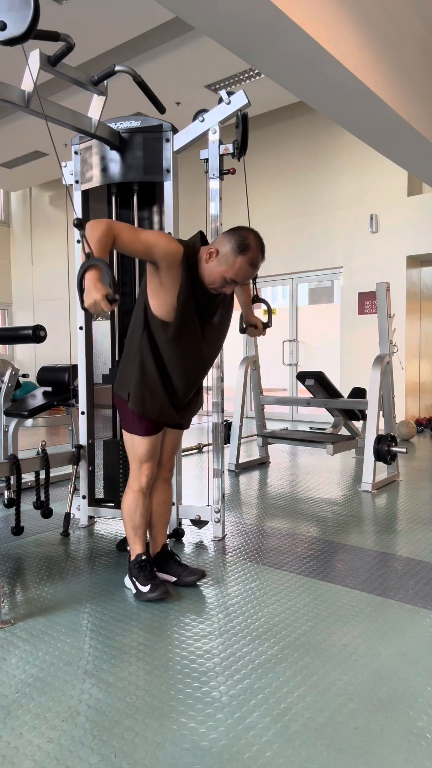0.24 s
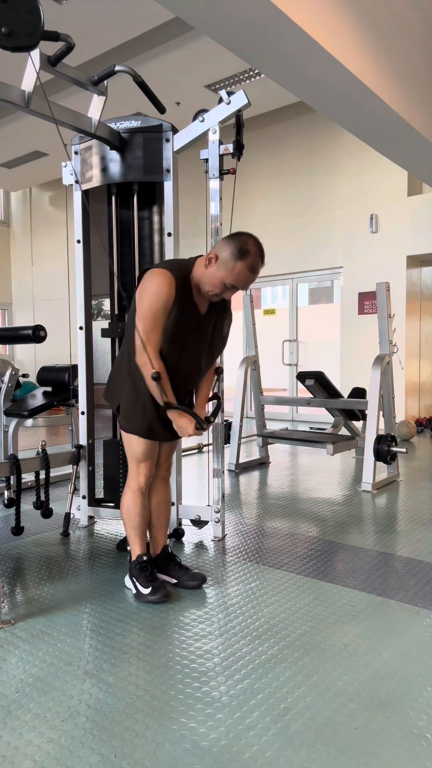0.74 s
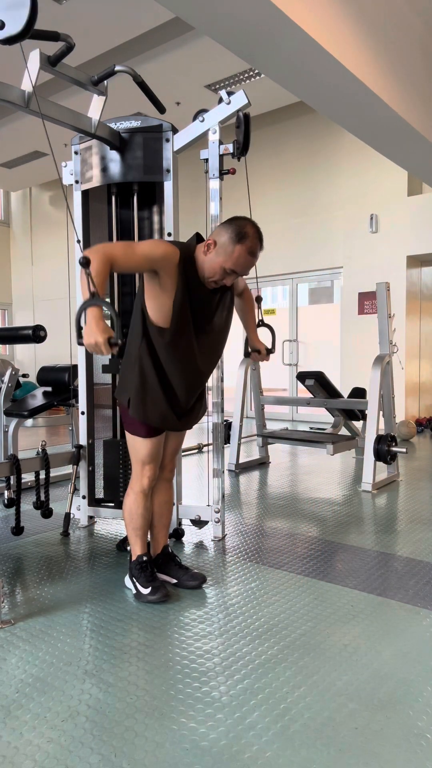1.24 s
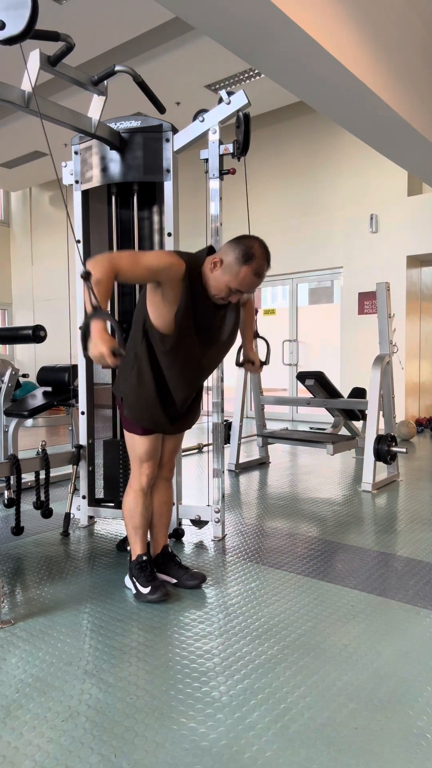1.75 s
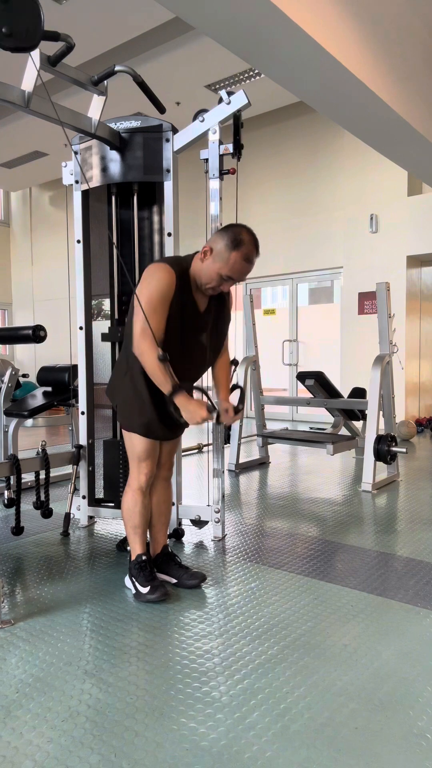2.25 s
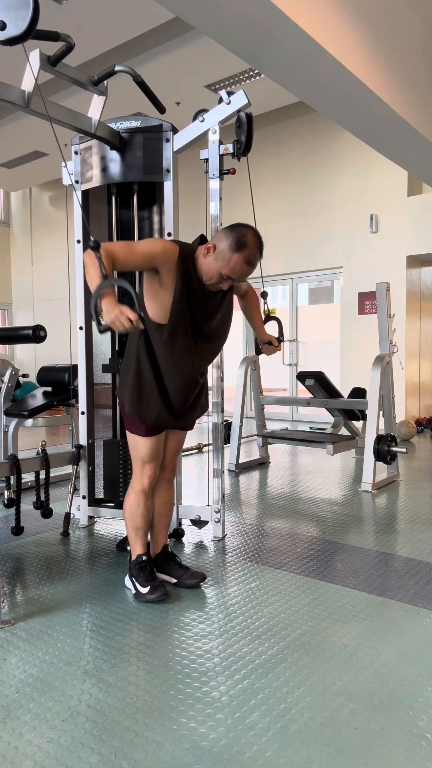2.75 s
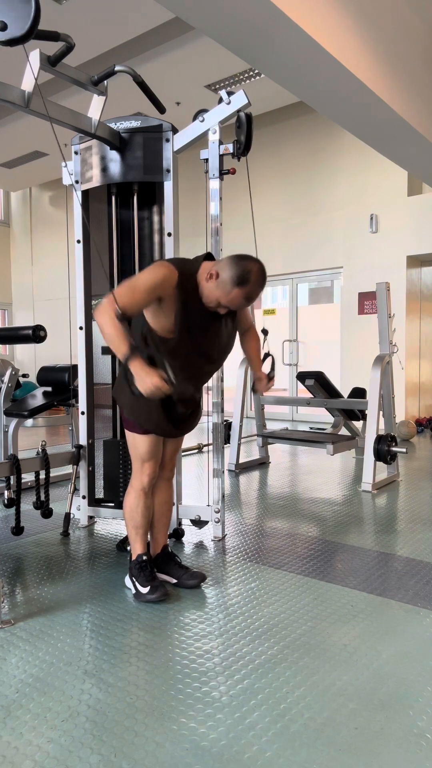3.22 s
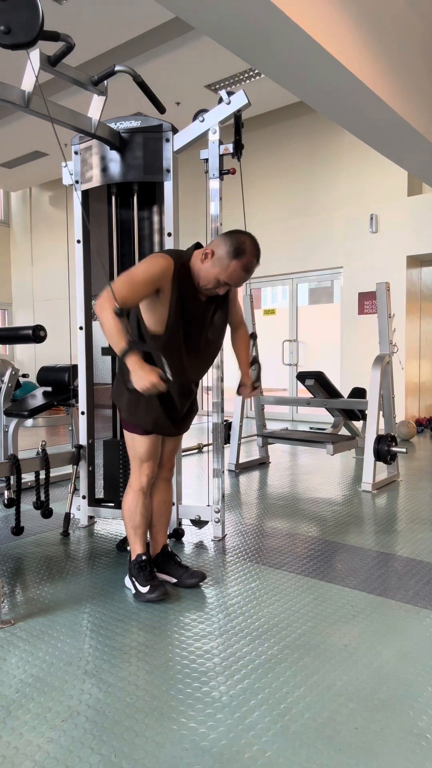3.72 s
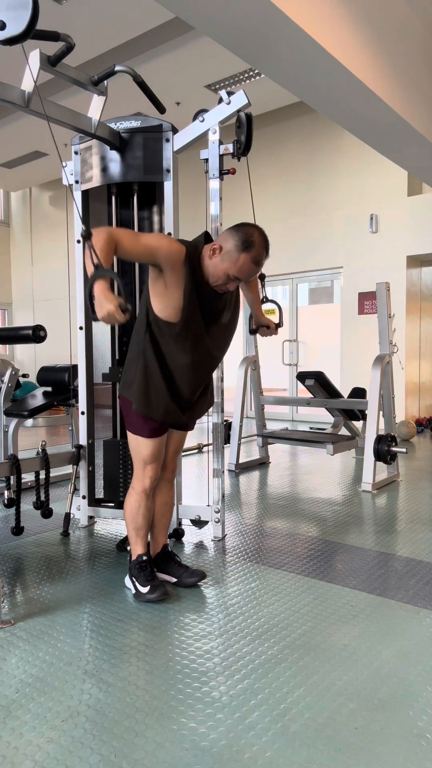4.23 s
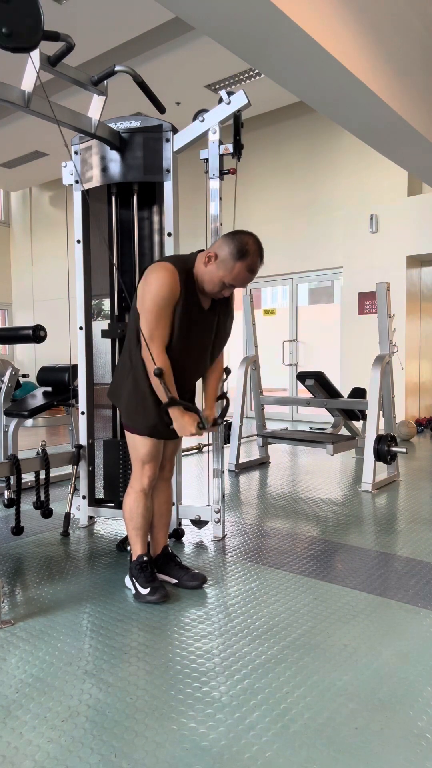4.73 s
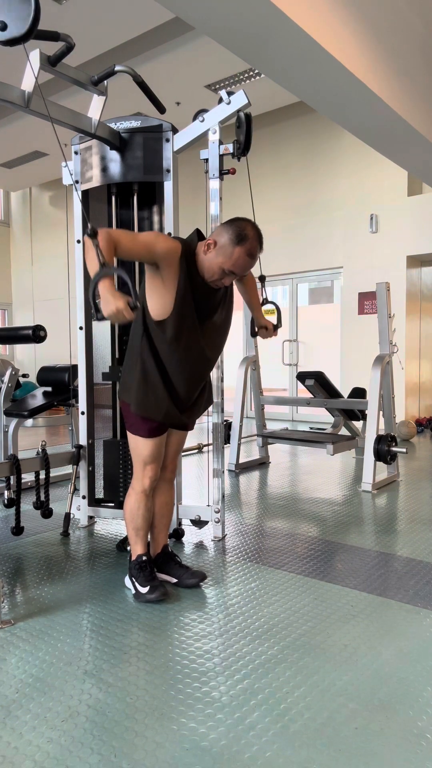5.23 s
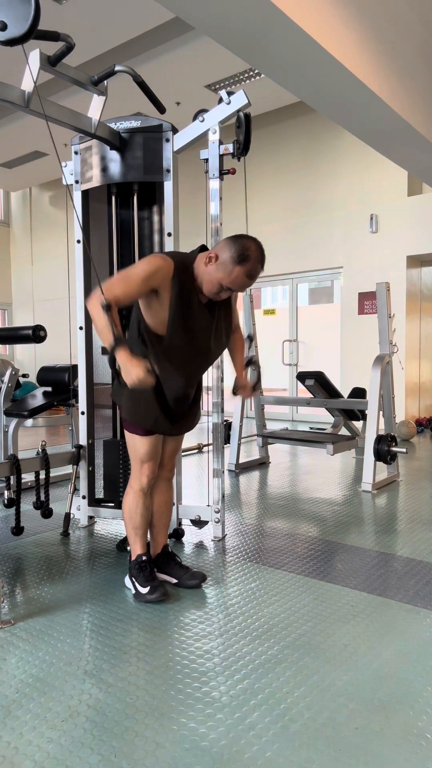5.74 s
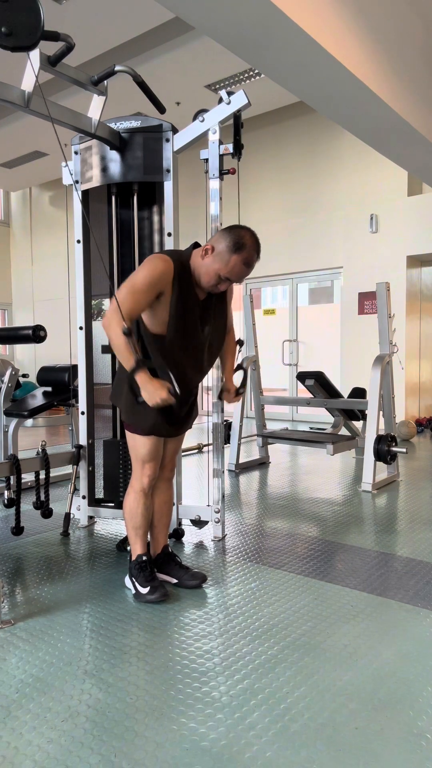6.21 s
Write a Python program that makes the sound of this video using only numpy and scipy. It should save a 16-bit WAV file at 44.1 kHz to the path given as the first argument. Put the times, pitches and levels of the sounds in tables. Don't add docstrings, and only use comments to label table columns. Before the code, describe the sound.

A large, hard gym hall carries a continuous bed of dull rushing air, low motor hum and rumble for a little over six seconds, heard in stereo by a phone a few metres from a cable machine. Faint pulley whir rises just before each handle knock. The first clank comes at 0.75 s, slightly muffled, with a rattling hook bounce just after. The second, at 2.2 s, is softer with more frame ring and a faint rebound; rumble swells slightly at 2.6. The third, at 3.45, has a clear bounce. Rubber grips rub at 4.6 just before a brighter fourth clank at 4.65. A strong deep rumble swells from 5.05, with small frame creaks at 5.25, 5.45 and 5.55, each weaker. Grips rub again around the loudest clank at 5.9, which rebounds and echoes through the hall. Tiny dry catch ticks accompany most knocks.

```python
import sys
import numpy as np
from scipy import signal
from scipy.fft import rfft, irfft
from scipy.io import wavfile
from scipy.ndimage import uniform_filter1d

SR = 44100
rng = np.random.default_rng(int(sys.argv[2]) if len(sys.argv) > 2 else 0)


def volts(x):
    e = np.asarray(x, float) / 20
    return 10 ** e


def pcm_store(signal):
    levels = np.round(np.clip(np.atleast_2d(signal), -1, 1) * 32767)
    wavfile.write(sys.argv[1], SR, levels.astype(np.int16).T)


N = 285327

# t/s, peak level/dB, then level/dB against it of
KNOCKS = [
    (0.7528, -22, -13, -15, -12.5),
    (2.1754, -24.5, -2, -21, -5.5),
    (3.4558, -24.5, -4, -16.5, -7.5),
    (4.6644, -21, -10.5, -15, -8),
    (5.9226, -19.5, -9.5, -19, -9.5),
]
# t/s, peak level/dB, then level/dB against it of frame, rattle
REBOUNDS = [
    (0.8049, -30.5, 4, 0),
    (2.2339, -39.5, 9, -13),
    (3.5239, -26.5, -3.5, -18),
    (4.715, -30.5, -1, -28),
    (5.985, -26.5, 1, -7),
]
STEEL_MODE_HZ = [
    (931, 1179, 1436, 1460, 1533),
    (362, 463, 533, 625),
    (1737, 1960, 2164, 2751, 4079, 4366, 4474, 5184),
    (2382, 2589, 2939, 3833, 4757, 4803, 5250, 6223),
]
# level/dB, time to fall by 60 dB/s
STEEL_MODES = [
    [(-5.5, 0.092), (-5, 0.16), (-5.5, 0.37), (-3.5, 0.24), (-6, 0.19)],
    [(-2.5, 0.28), (0, 0.21), (2, 0.27), (-3, 0.2)],
    [(9, 0.62), (4.5, 0.48), (-4, 0.48), (4, 0.21), (11, 0.072), (2, 0.099), (7, 0.19), (18, 0.031)],
    [(3, 0.3), (-6.5, 0.2), (-0.5, 0.21), (-21, .1), (-1, 0.22), (1.5, 0.18), (3, 0.041), (-47, 0.11)],
]
# f/Hz, level/dB
RATTLE_COLOUR = [(150, -0.5), (400, 2.5), (1000, -0.5), (2500, -2.5), (4800, -8), (5600, -14.5),
                 (7000, -18.5), (10000, -22), (15000, -43)]
# t/s, length/s, rattle level/dB, thud level/dB
GRIP_RUBS = [
    (4.62, 0.056, -28, -27.5),
    (5.897, 0.04, -29, -31),
    (5.944, 0.011, -41, -23),
]
# t/s, level/dB
CATCH_TICKS = [
    (0.754, -45),
    (.878, -45.5),
    (1.885, -86),
    (2.178, -42),
    (4.67, -46),
    (4.865, -53),
    (5.927, -39),
]
# t/s, length/s, final f/Hz, level/dB
CREAKS = [
    (5.228, .07, 312, -33.5),
    (5.44, .06, 322, -39),
    (5.53, .04, 350, -42),
]
# f/Hz, time to fall by 60 dB/s
HALL_DECAY = [(150, 1.33), (500, 2.26), (1500, 2.33), (4000, 1.67), (8000, 0.73), (14000, 0.29)]
# f/Hz, level/dB per Hz
AIR_COLOUR = [(15, -32), (30, -41), (42, 0), (122, 1), (140, -0.5), (421, -8.5), (666, -12.5), (790, -13),
              (850, -17.5), (2060, -19), (3200, -29.5), (6210, -39), (9300, -52.5), (15500, -56.5)]
# f/Hz, width/Hz, level/dB
MOTOR_HUMS = [(120.1, 5.3, -43.5), (237.7, 18, -49.5), (318, 22, -56.5), (428.4, 29, -49.5),
              (743.8, 13.5, -54), (778, 20, -51.5)]
# t/s, length/s, rise in level/dB
RUMBLE_SWELLS = [
    (2.6, 0.46, 1),
    (5.046, 0.5, 8),
]
# f/Hz, level/dB
LEFT_MINUS_RIGHT = [(60, -1), (110, -3), (200, -3.5), (380, -4.5), (700, -3.5), (1290, -2.5), (2380, -0.5),
                    (4400, 0.5), (8120, 2), (15000, -4)]
# f/Hz, level/dB
PORT_SUM = [(6600, 0), (7050, -4), (7450, -20), (8350, -20), (8800, -3), (9500, 0), (13800, 1), (14600, -3),
            (15000, -24)]
# f/Hz, level/dB
PORT_DIFFERENCE_HOLE = [(9500, 0), (9900, -5), (10400, -26), (13200, -26), (13800, -6), (14200, -4)]
# f/Hz, level/dB
PORT_DIFFERENCE = [(30, -34), (60, -32), (125, -29), (250, -19.5), (500, -13), (1000, -2.5), (2000, -6),
                   (2280, -11), (2600, 0.5), (4000, -7), (6500, 2), (8000, 4.5), (15000, 6)]


def level(x, db):
    return x * volts(db) / np.sqrt(np.mean(x ** 2))


def on_hz(table, hz):
    f, value = np.transpose(table)
    return np.interp(np.log(np.maximum(hz, 1)), np.log(np.maximum(f, 1)), value)


def shape(x, gain):
    return irfft(rfft(x) * gain(np.fft.rfftfreq(x.shape[-1], 1 / SR)), x.shape[-1])


def band(hz, width, rows):
    noise = rng.standard_normal(rows)
    return level(shape(noise, lambda f: 1 / (1 + (2 * (f - hz) / width) ** 2)), 0)


def walk(rate):
    hold = int(SR / rate)
    steps = np.repeat(rng.standard_normal(N // hold + 1), hold)
    return 1.3 * uniform_filter1d(uniform_filter1d(steps, hold), hold)[:N]


def swell(start, length, rise, fade):
    t = np.arange(N) / SR - start
    return np.clip(t / rise, 0, 1) * np.exp(-np.maximum(t - length, 0) / fade)


def ring(hz, modes, t, chance):
    db, t60 = np.transpose(modes)[:, :, None]
    scatter = chance[:, :len(modes), None]
    db = db + 0.7 * scatter[0]
    hz = np.c_[list(hz)] * (1 + 0.001 * scatter[1])
    fade = 1000. ** (-t / t60)
    return np.sum(volts(db) * np.sin(2 * np.pi * hz * t) * fade, axis=0)


def handles():
    out, t = np.zeros(N + SR), np.arange(SR // 2) / SR
    rattle_db, held_db = -2.5, -31.5
    choke = volts(-13.5) + np.exp(-(t / 0.027) ** 4)
    rise = 1 - np.exp(-t / 0.0055)
    blows = [(*row, rattle_db) for row in KNOCKS]
    blows += [(s, db, frame, held_db, held_db, rattle) for s, db, frame, rattle in REBOUNDS]
    for s, db, frame_db, first_db, second_db, noise_db in sorted(blows):
        chance = rng.standard_normal((2, 8))
        part_levels = (0, frame_db, first_db, second_db)
        steel = 0
        for hz, modes, part_db in zip(STEEL_MODE_HZ, STEEL_MODES, part_levels):
            steel = steel + volts(part_db) * ring(hz, modes, t, chance)
        noise = shape(rng.standard_normal(len(t)), lambda f: volts(on_hz(RATTLE_COLOUR, f)))
        rattle = level(noise, noise_db) * np.exp(-t / 0.02)
        blow = (volts(-3.0) * steel * choke + volts(2.0) * rattle) * rise
        start = int(s * SR)
        out[start:start + len(t)] += volts(db) * blow
    return out[:N]


def grips():
    t, out = np.arange(N) / SR, 0
    noise = shape(rng.standard_normal(N), lambda f: volts(on_hz(RATTLE_COLOUR, f)))
    rub = level(noise, 0) * volts(1.9 * walk(150))
    thud = band(466, 400, N)
    for s, length, rattle_db, thud_db in GRIP_RUBS:
        progress = np.clip((t - s) / length, 0, 3)
        loudness = (1 - np.exp(-progress / 0.19)) * np.exp(-progress ** 4)
        late_thud = np.tanh(3 * progress) * thud
        out = out + loudness * (volts(rattle_db) * rub + volts(thud_db) * late_thud)
    return out


def pulleys():
    t = np.arange(N) / SR
    lead_s, pull_s = 0.17, 0.2
    speed = sum(np.exp(-((t - row[0] + lead_s) / pull_s) ** 2) for row in KNOCKS)
    whir_db = -60 + 5 * speed + 2.2 * walk(25)
    return volts(whir_db) * (band(2100, 3000, N) + volts(-10.5) * band(6000, 8000, N))


def creaking_frame():
    t, out = np.arange(N) / SR, 0
    grip, wobble = volts(3.0 * walk(45)), 1 + 0.025 * walk(60)
    glide, glide_s, edge_s = 0.2054, 0.03, 0.011
    for s, length, hz, db in CREAKS:
        pitch_hz = hz * wobble * (1 - glide * np.exp(-np.abs(t - s) / glide_s))
        tone = np.sin(2 * np.pi * np.cumsum(pitch_hz) / SR)
        out = out + volts(db) * swell(s, length, edge_s, edge_s) * grip * tone
    return out


def catch():
    t = np.arange(N) / SR
    burst = sum(volts(db) * (t > s) * np.exp(-np.abs(t - s) / 0.0044) for s, db in CATCH_TICKS)
    return burst * band(10500, 9000, N)


def hall(x):
    t, tail = np.arange(2 * SR) / SR, 0
    for hz in 90 * 2 ** np.arange(0, 8, 0.5):
        fade = 1000. ** (-t / on_hz(HALL_DECAY, hz))
        tail = tail + band(hz, hz / 1.7, (2, 2 * SR)) * np.sqrt(hz) * fade
    tail = tail * (1 - np.exp(-(t / 0.02) ** 2))
    tail = tail / np.sqrt(np.sum(tail ** 2) / 2)
    return signal.fftconvolve(x[None], tail, axes=1)[:, :N]


def ventilation():
    noise = shape(rng.standard_normal((2, N)), lambda f: volts(on_hz(AIR_COLOUR, f)))
    air = 0
    for hz in 25 * 2 ** np.arange(0, 10.):
        octave = shape(noise, lambda f: np.cos(np.pi / 2 * np.clip(np.log2((f + 1) / hz), -1, 1)) ** 2)
        air = air + octave * volts(0.8 * walk(1.5) + 1.1 * walk(9))
    hum = sum(volts(db) * band(hz, width, (2, N)) for hz, width, db in MOTOR_HUMS)
    rise_s, fade_s = 0.052, 0.2
    rumble_db = -42.5 + sum(db * swell(s, length, rise_s, fade_s) for s, length, db in RUMBLE_SWELLS)
    return level(air, -35.0) + hum + volts(rumble_db) * band(65.1, 9.9, (2, N))


def scene():
    direct = handles() + grips() + pulleys() + creaking_frame() + catch()
    common, other = volts(-0.93) * hall(direct) + ventilation()
    total = shape(direct + common, lambda f: volts(on_hz(PORT_SUM, f)))
    early = shape(direct, lambda f: 1j + 0 * f)
    differ = shape(other + volts(-0.5) * early,
                   lambda f: volts(on_hz(PORT_DIFFERENCE, f) + on_hz(PORT_DIFFERENCE_HOLE, f)))
    shading = shape(total, lambda f: np.tanh(np.log(volts(on_hz(LEFT_MINUS_RIGHT, f))) / 2))
    differ = differ + shading
    return np.array([total + differ, total - differ])


def top_cut(x):
    return signal.sosfilt(signal.butter(12, 15710, fs=SR, output="sos"), x)


def record(dry):
    return top_cut(dry)


dry = scene()
out = record(dry)
pcm_store(out)
```